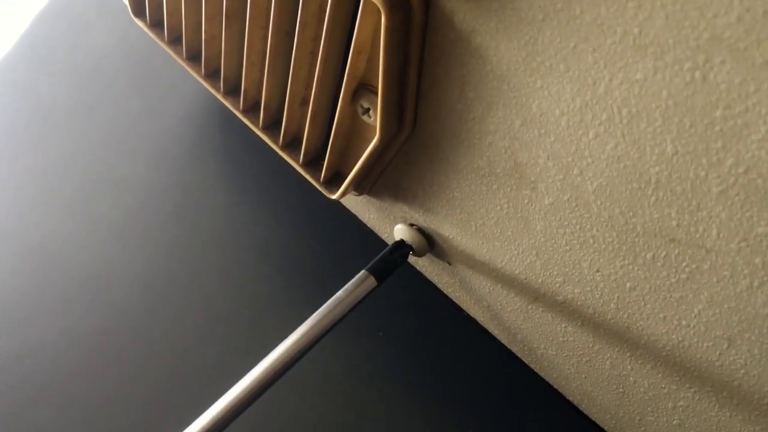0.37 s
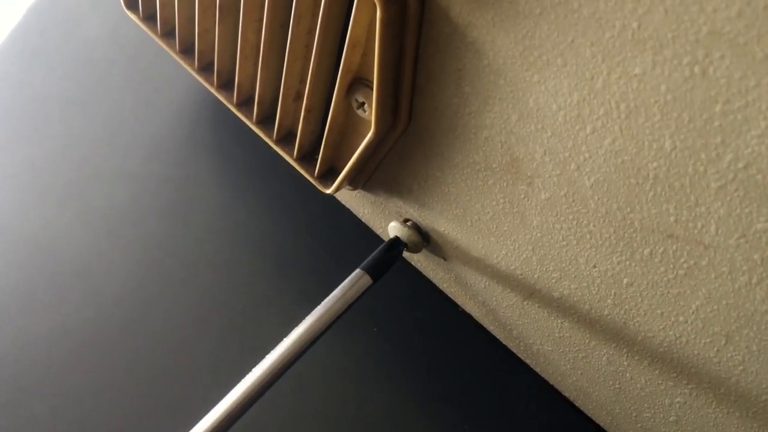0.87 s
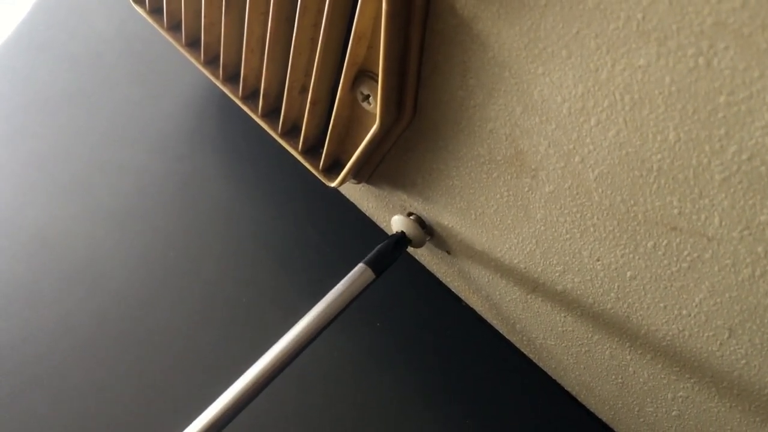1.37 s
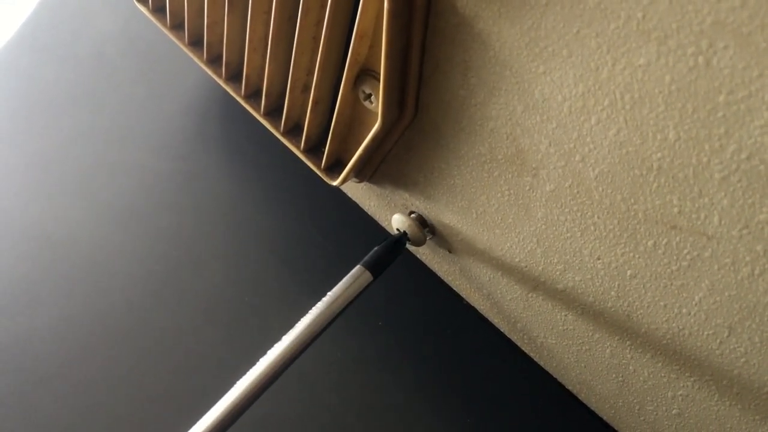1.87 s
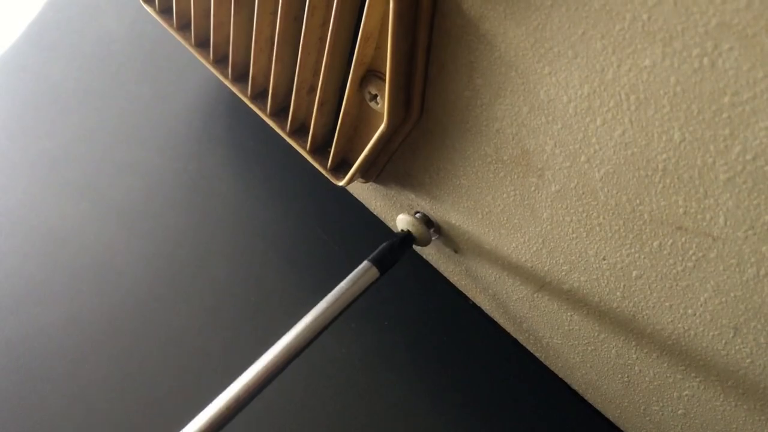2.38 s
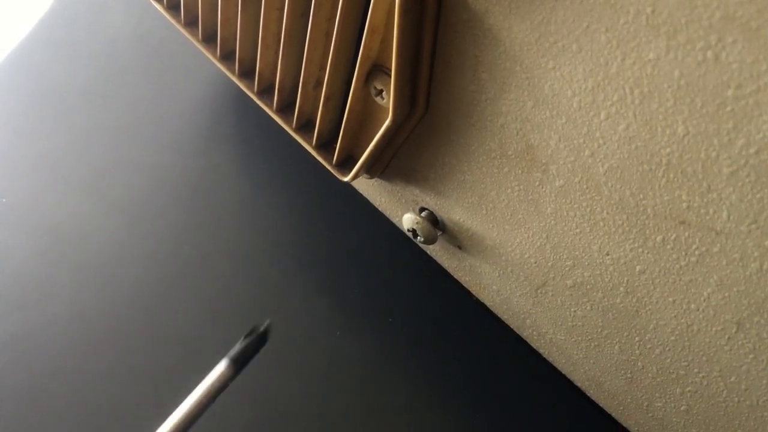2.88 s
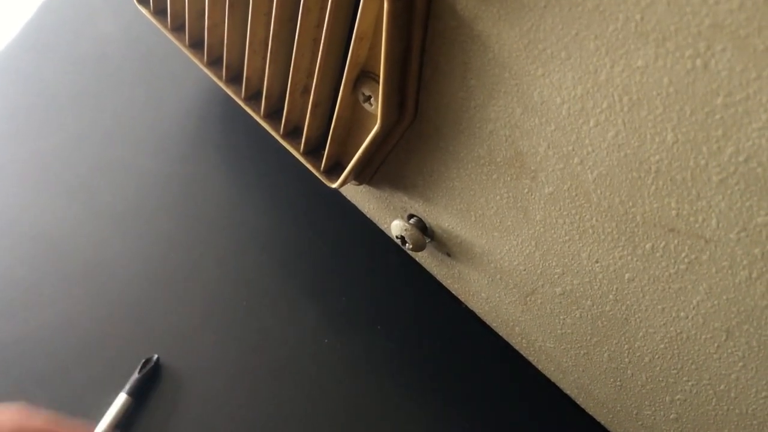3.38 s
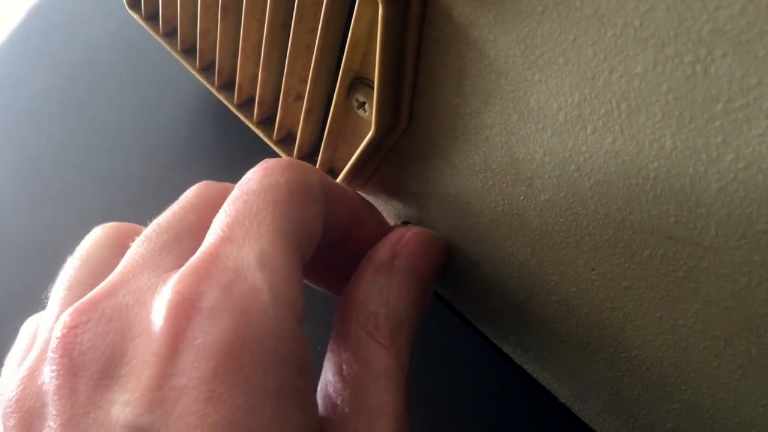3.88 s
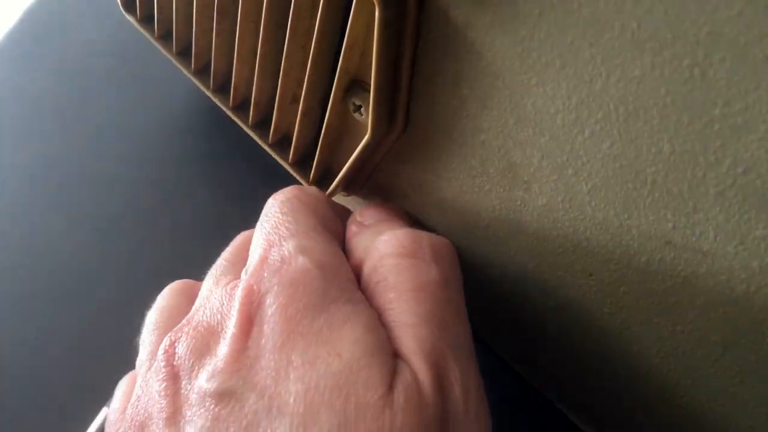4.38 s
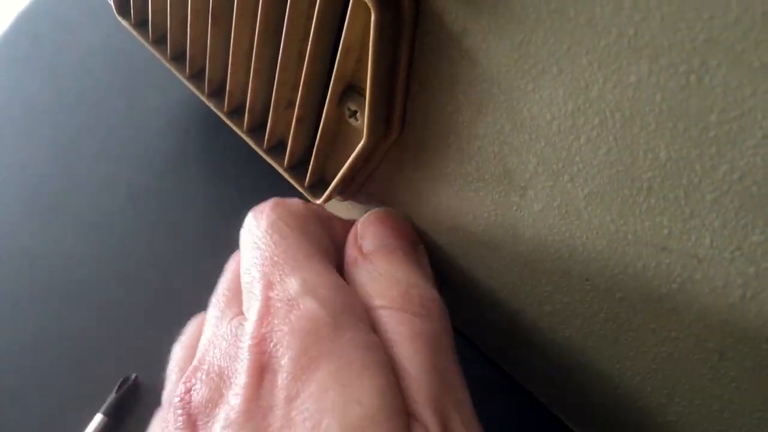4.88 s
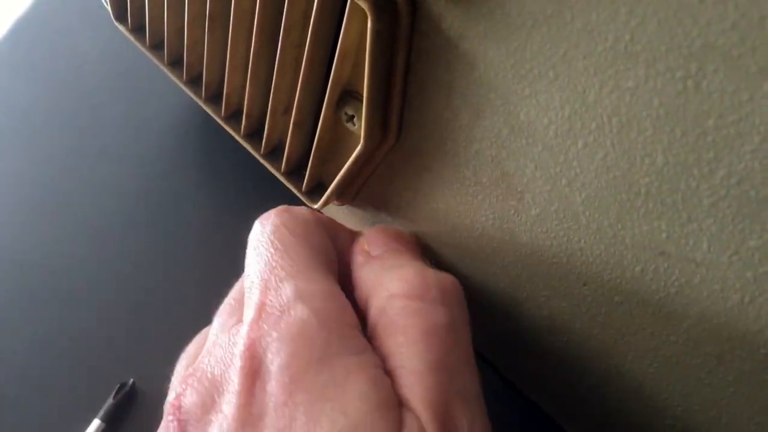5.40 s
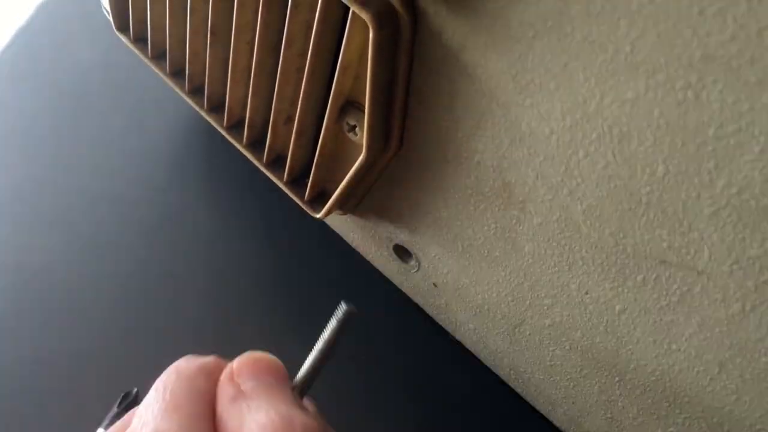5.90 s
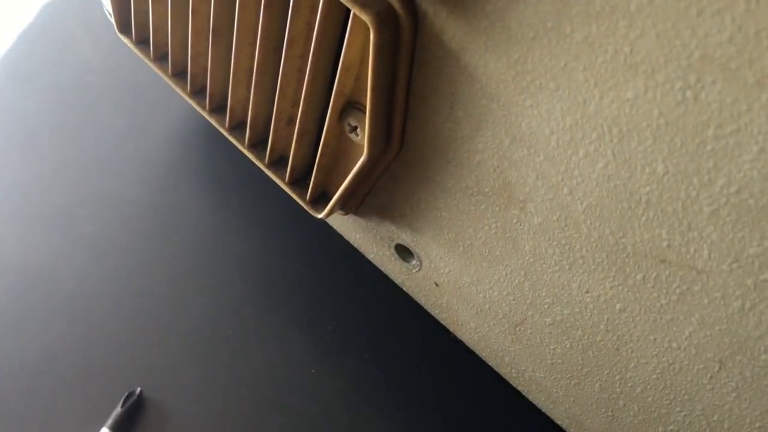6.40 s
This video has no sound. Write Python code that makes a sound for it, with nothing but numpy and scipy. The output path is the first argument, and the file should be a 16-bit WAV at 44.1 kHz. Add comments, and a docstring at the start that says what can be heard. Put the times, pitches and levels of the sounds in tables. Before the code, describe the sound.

Very close microphone, dry small room. Isolated creaky strokes of a screw in its thread make a thin metal panel ring and boom, growing denser before the screwdriver drops onto the bench, thudding and rattling briefly. A short lull follows, then fingers work the screw with light rubs, gritty scrapes and tinny knocks, loudest just before it comes out. A faint thin tone fades, and a tiny skid ends it.

```python
"""Small quiet room, one microphone close to a thin sheet-metal case: a hand screwdriver turns a screw.
The thread scrapes in grainy strokes, knocks ring and boom the case as modes, skin rubs as streaky noise.
At about 3.1 s the tool lands on the bench: a thud, ticking bounces and short skids.
From about 4 s bare fingers turn the screw on; at 5.84 s it is out and a thin sine tone lingers.
Near the end the screw skids on the bench; shaped room noise and a faint narrow hum lie behind it all."""
import sys
import numpy as np
from scipy import signal
from scipy.fft import rfft, irfft, next_fast_len
from scipy.io import wavfile
from scipy.ndimage import uniform_filter1d, map_coordinates

SR = 44100
rng = np.random.default_rng(int(sys.argv[2]) if len(sys.argv) > 2 else 0)


def field_ratio(decibels):
    """Amplitude ratio for a level in dB (20 dB per decade); scalars and array-likes work."""
    return 10 ** (np.asarray(decibels, dtype=float) / 20)


def waveform_to_disk(signal):
    """Save audio, clipped to [-1, 1], as 16-bit WAV at the path in sys.argv[1]."""
    frames = np.transpose(np.atleast_2d(signal))
    scaled = np.clip(frames, -1, 1) * 32767
    samples = np.round(scaled).astype(np.int16)
    wavfile.write(sys.argv[1], SR, samples)


N = 287311  # samples, about 6.5 s


def unit(x):
    """Scaled to rms 1."""
    return x / np.sqrt(np.mean(x ** 2) + 1e-20)


def along(points, hz):
    """Values read between (Hz, value) points on a log frequency axis."""
    f, v = np.transpose(points)
    return np.interp(np.log(hz + 1), np.log(f + 1), v)


def filtered(x, response):
    """x times a complex response of frequency."""
    m = next_fast_len(len(x) + SR // 2)
    return irfft(rfft(x, m) * response(np.fft.rfftfreq(m, 1 / SR)), m)[:len(x)]


def ringing(x, modes):
    """x driving damped resonances (Hz, width Hz, dB), summed with alternating sign."""
    def response(f):
        total = 0
        for k, (hz, width, db) in enumerate(modes):
            damping = 1j * f * width
            total = total + (-1) ** k * field_ratio(db) * damping / (hz * hz - f * f + damping)
        return total
    return filtered(x, response)


def driven(gain, force, modes):
    """Modes pushed by a force that follows a gain curve; they ring on after it stops."""
    return ringing(gain * force, modes) / np.std(ringing(force, modes))


def soft(force, contact_s):
    """A yielding contact spreads each push over its duration and loses the treble."""
    pad = np.hanning(round(contact_s * SR) + 3)
    return signal.fftconvolve(force, pad / pad.sum())[:len(force)]


def wobble(rate):
    """A smooth random curve, rate knots a second."""
    knots = rng.standard_normal(int(N * rate / SR) + 4)
    return map_coordinates(knots, [np.arange(N) * rate / SR])


def grit(rate, spread_db):
    """Tiny slips at random moments, rate a second, a few much larger than the rest; rms 1."""
    chance, size, sign = rng.random((3, N))
    strength = field_ratio(-spread_db * np.log(size + 1e-4))
    return unit((chance < rate / SR) * strength * np.sign(sign - 0.5))


def streaky(spectrum, depth_db, wide_hz, long_s, glide_hz=0, grains=0):
    """Noise of rms 1 in which narrow bands swell, fade and slide in pitch at random."""
    source = np.pad(rng.standard_normal(N) + grains, (0, 512))
    z = signal.stft(source, nperseg=512, noverlap=384)[2]
    field = uniform_filter1d(rng.standard_normal(z.shape), max(1, round(wide_hz * 512 / SR)), 0)
    field = uniform_filter1d(field, max(1, round(long_s * SR / 128)), 1)
    row, frame = np.indices(z.shape)
    slide = np.interp(frame[0] * 128, np.arange(N), wobble(11)) * glide_hz * 512 / SR
    field = map_coordinates(field, [row + slide * row / len(z), frame], order=1, mode="reflect")
    # whole regions of the band come and go too
    broad = uniform_filter1d(rng.standard_normal(z.shape), 25)
    broad = uniform_filter1d(broad, 30, 0)
    field = unit(field) + 0.8 * unit(broad)
    x = signal.istft(z * field_ratio(depth_db * unit(field)), nperseg=512, noverlap=384)[1][:N]
    return unit(filtered(x, lambda hz: field_ratio(along(spectrum, hz))))


def blow(db, modes, chatter_s, contact_s=0):
    """One contact: a chatter of force, 60 dB down in chatter_s, through uneven modes, scaled to its peak."""
    t = np.arange(SR // 4) / SR
    chatter = rng.standard_normal(len(t)) * field_ratio(-60 * t / chatter_s)
    force = soft(chatter * (1 - np.exp(-t / 0.0027)), contact_s)
    uneven = [(hz, width, level + rng.normal(0, 1.0)) for hz, width, level in modes]
    y = ringing(force, uneven)
    return field_ratio(db) * y / np.abs(y).max()


def add(track, s, sound):
    """Mix a sound in at time s."""
    at = round(s * SR)
    track[at:at + len(sound)] += sound[:N - at]


def swell(rows, column, rise):
    """Gain curve of short strokes: each rises over a share of its length, then falls."""
    out = np.zeros(N)
    for row in rows:
        u = np.linspace(0, 1, round(row[1] * SR) + 2)
        shape = np.sin(np.pi / 2 * np.minimum(u / rise, (1 - u) / (1 - rise))) ** 0.88
        add(out, row[0], field_ratio(row[column]) * shape)
    return out


def turning():
    """The screw scrapes round in strokes; skin slides and the case booms low, during and between them."""
    return thread_strokes() + low_booms() + skin()


# The screw slipping round in its thread, close to the microphone.
# Each row: start in seconds, length in seconds, level of the panels in dB, level of the scrape in dB.
STROKES = [(0.224, 0.052, -46, -50.5), (0.742, 0.051, -37.5, -46), (1.259, 0.13, -42.5, -61.5),
           (1.645, 0.05, -50, -57), (1.771, 0.14, -47, -56.5), (2.227, 0.061, -32, -50.5),
           (2.396, 0.12, -39, -46), (2.639, 0.038, -39, -45.5), (2.681, 0.069, -40.5, -46.5),
           (4.025, 0.0474, -36.5, -50.5), (4.433, 0.067, -53.5, -53), (4.728, 0.13, -33, -43.5),
           (4.953, 0.12, -43, -47), (5.276, 0.062, -41, -42.5), (5.428, 0.094, -35.5, -37),
           (5.521, 0.18, -43.5, -52.5), (5.713, 0.03, -51.5, -41.5), (5.739, 0.1, -40.5, -34)]
# Upper modes of the sheet-metal case, which the knocks ring too.
# Each row: centre in Hz, width in Hz, relative level in dB.
SHEET = [(608.6, 86, 5), (962, 91, -2.5), (1093, 130, -8), (1500, 300, -6), (1950, 93, -7.5),
         (2130, 81, -9), (2790, 120, -7), (3083, 130, -3.5), (3314, 440, -7), (4350, 700, -12.5)]


def thread_strokes():
    """Friction in the thread rings the sheet; the hiss grows more slowly than the scrape."""
    hiss_db, hiss_share = -29.5, 0.43  # hiss level = hiss_db + share of the scrape's dB
    strokes = [(*row, hiss_db + hiss_share * row[-1]) for row in STROKES]
    return friction(strokes, SHEET, rough_db=3.5)


# Colour of rubbing, for sliding skin and for the hiss at a scraping contact.
# Each row: frequency in Hz, relative density in dB per Hz.
RUB = [(2500, -21), (4200, -16), (5300, -2), (7000, -4.5), (9500, -6), (11500, -7.5), (14000, 1.5),
       (16000, -9)]


def friction(strokes, body, rough_db):
    """Slips in grains: they ring the body and hiss at the contact, while pushes shake the low panels."""
    slips = field_ratio(rough_db * wobble(90)) * grit(rate=3200, spread_db=0.5)  # the grip is never even
    drag = streaky([(1000, 0)], depth_db=1.3, wide_hz=600, long_s=0.04, grains=2 * slips)
    scrape = driven(swell(strokes, column=3, rise=0.36), drag, body)
    patchy = streaky(RUB, depth_db=4.5, wide_hz=910.5, long_s=0.04, grains=1.9 * slips)
    # falls 6 dB an octave either side of 7 kHz
    hiss = unit(filtered(patchy, lambda hz: field_ratio(-6 * np.abs(np.log2((hz + 1) / 7000)))))
    return shaking(strokes) + scrape + swell(strokes, column=4, rise=0.4) * hiss


# Broad low panels of the case, sounded by friction, by the low booms and by knocks.
# Each row: centre in Hz, width in Hz, relative level in dB.
BOOM = [(125.4, 46, -16.5), (150.6, 9.2, -0.5), (236.3, 16.5, 1.5), (376.2, 16, -13), (411.2, 53, -9.5),
        (542, 78, -3.5)]


def shaking(strokes):
    """Soft uneven pushes keep the low panels booming."""
    pushes = soft(grit(rate=600, spread_db=1.42), contact_s=0.0027)
    return driven(swell(strokes, column=2, rise=0.21), pushes, BOOM)


# Low booms of the case, alone or under knocks and scrapes.
# Each row: start in seconds, relative strength of the force in dB.
LOW_BOOMS = [(0.242, -31.5), (0.831, -31), (1.068, -58), (1.204, -44), (1.342, -38.5), (1.658, -39),
             (1.697, -54.5), (1.907, -38.5), (2.3, -38), (2.496, -37.5), (3.935, -35.5), (4.045, -34.5),
             (4.157, -44.5), (4.217, -43), (4.263, -52), (4.806, -33.5), (4.94, -39), (5.304, -31.5)]


def low_booms():
    """Each boom starts with one soft shove of force, then trembles; only the low panels answer."""
    tremble_s = 0.039
    shove_db, tremble_db = 56, 30  # force added to each boom's relative strength
    trembles = [(s, tremble_s, db) for s, db in LOW_BOOMS]
    trembling = swell(trembles, column=2, rise=0.29) * grit(rate=600, spread_db=2.6)
    force = field_ratio(tremble_db) * trembling
    for s, db in LOW_BOOMS:
        force[round(s * SR)] += field_ratio(db + shove_db)
    return ringing(soft(force, contact_s=0.0032), BOOM)


# Skin sliding on the handle or the screw head, close to the microphone.
# Each row: start in seconds, level in dB.
RUBS = [(0.027, -65), (0.089, -58), (0.129, -54.5), (0.359, -57.5), (0.552, -60.5), (0.63, -59.5),
        (0.7, -63.5), (0.881, -65.5), (1.072, -63.5), (1.159, -56), (1.461, -62), (1.602, -56.5),
        (1.724, -61), (1.796, -56), (1.928, -58), (2.174, -57), (2.368, -56.5), (2.51, -59.5),
        (2.731, -51.5), (2.81, -62.5), (3.059, -59.5), (4.207, -60), (4.303, -55), (4.898, -57),
        (5.067, -60.5), (5.243, -65), (5.366, -50)]


def skin():
    """Sliding skin is a grainy, streaky hiss; a thin decaying tone lingers once the screw is out."""
    slide_s = 0.083
    palm = (0.0, 3.05, -73)  # on the handle all the while: start s, length s, dB
    slides = [palm] + [(s, slide_s, db) for s, db in RUBS]
    grains = 0.69 * grit(rate=930, spread_db=2.5)
    hiss = streaky(RUB, depth_db=7.5, wide_hz=330, long_s=0.072, glide_hz=350, grains=grains)
    out = swell(slides, column=2, rise=0.25) * hiss
    freed_s, tone_hz, tone_db, t60_s = 5.84, 3549, -78.5, 1
    t = np.arange(SR) / SR
    add(out, freed_s, field_ratio(tone_db - 60 * t / t60_s) * np.sin(2 * np.pi * tone_hz * t))
    return out


# The tip or the screw knocking the case, close to the microphone.
# Each row: start in seconds, peak of the sheet in dB, hardness as tick over that peak in dB,
# pitch in Hz that the struck spot rings best.
KNOCKS = [(0.241, -30.5, -12, 900), (0.83, -22, -24, 940), (1.284, -34, -9, 920), (1.596, -44.5, -21, 520),
          (1.65, -36.5, 6.5, 760), (1.826, -39, 3, 3280), (2.231, -24, -8, 970), (2.249, -29.5, 6, 3050),
          (2.267, -22.5, -4.5, 1470), (2.401, -27.5, -10.5, 1570), (2.422, -27, 3, 3530),
          (2.492, -23, 1.5, 1350), (2.654, -27.5, -41, 720), (2.685, -30.5, -2.5, 4380),
          (2.72, -31.5, 0, 3460), (3.831, -40.5, 1, 506), (3.936, -48.5, 6, 2650), (4.449, -35, 3, 1500),
          (4.546, -58.5, 13.5, 3000), (4.587, -27, -15.5, 1420), (4.811, -36, 4.5, 2830),
          (5.02, -26.5, -29, 1120), (5.079, -37, -3.5, 3370), (5.308, -24, -25, 930),
          (5.521, -21.5, -5.5, 1080), (5.571, -28.5, 9, 2210), (5.691, -24, -29, 2620),
          (5.7009, -16.5, -16.5, 1930), (5.81, -47.5, 14, 4100), (5.825, -44, 15, 4100)]


def knocks():
    """Each knock rings the sheet in the colour of its spot, booms the panels and ticks at the contact."""
    spot_db_per_octave = 9  # modes fade away from the spot's best pitch
    boom_db = -22  # panels over the knock's peak
    out = np.zeros(N)
    for s, db, tick_db, spot_hz in KNOCKS:
        spot = [(hz, width, level - spot_db_per_octave * abs(np.log2(hz / spot_hz)))
                for hz, width, level in SHEET]
        add(out, s, blow(db, spot, chatter_s=0.016, contact_s=0.073 / spot_hz))
        add(out, s, blow(db + boom_db, BOOM, chatter_s=0.0068, contact_s=0.0024))
        tick = [(6600 * field_ratio(rng.normal(0, 1.0)), 1800, 0), (11500, 5000, -10)]
        add(out, s, blow(db + tick_db, tick, chatter_s=0.0097))
    return out


# The tool landing and bouncing on the bench. Each row: start in seconds, peak in dB.
DROP = [(3.1612, -21), (3.2062, -23), (3.228, -16), (3.2397, -23), (3.256, -35.5)]
# The tool, and last the screw, skidding on the bench.
# Each row: start in seconds, length in seconds, rumble in dB, clatter in dB, hiss in dB.
SKIDS = [(3.105, 0.074, -44.5, -40, -48), (3.162, 0.076, -37, -39, -47), (3.205, 0.074, -44, -33.5, -61.5),
         (6.478, 0.056, -74.5, -41.5, -79.5)]
# Modes of bench and tool. Each row: centre in Hz, width in Hz, relative level in dB.
BENCH = [(530, 130, -9.5), (900, 120, 1.5), (1300, 120, 0), (1587, 130, -2.5), (2066, 120, -3),
         (2260, 220, -4.5), (2590, 170, -2), (3540, 320, -9.5)]
# Modes of the steel shaft. Each row: centre in Hz, width in Hz, relative level in dB.
SHAFT = [(6150, 500, 1.5), (7540, 8400, -10), (8700, 830, -7.5)]


def dropped_tool():
    """The handle thuds on the bench, the shaft ticks at each bounce, and friction makes the skids."""
    thud_s, thud_db = 3.1572, -10
    shaft_db = 3.5  # shaft tick over each bounce
    out = friction(SKIDS, BENCH, rough_db=0.5)
    handle = [(520, 420, 0), (90, 120, -17)]
    add(out, thud_s, blow(thud_db, handle, chatter_s=0.0015, contact_s=0.0022))
    for s, db in DROP:
        add(out, s, blow(db, BENCH, chatter_s=0.027))
        add(out, s, blow(db + shaft_db, SHAFT, chatter_s=0.004))
    return out


# How long the small room answers. Each row: frequency in Hz, time to fall 60 dB in seconds.
ROOM = [(150, 0.37), (600, 0.18), (2500, 0.16), (10000, 0.12)]


def room(x):
    """Each frequency of the room's answer dies at its own speed; every quarter second gets its own tail."""
    out, step = np.zeros(N), SR // 4
    for at in range(0, N, step):
        hz, t, z = signal.stft(rng.standard_normal(SR // 2), SR, nperseg=256)
        decay = field_ratio(-60 * t / along(ROOM, hz)[:, None])
        tail = signal.istft(z * decay, SR, nperseg=256)[1]
        late = np.pad(x[at:at + step], (130, 0))  # the answer starts 3 ms later
        add(out, at / SR, signal.fftconvolve(late, tail / np.linalg.norm(tail)))
    return filtered(out, lambda hz: 1 / (1 + 1j * hz / 5000))  # soft furnishings dull the answer


# Colour of the room air. Each row: frequency in Hz, relative density in dB per Hz.
AIR = [(25, -22.5), (62, -7.5), (105, -15), (150, -9), (400, -20.5), (1100, -29), (3600, -34),
       (4800, -38.5), (16000, -43.5)]
# The background sinks after loud moments and comes back. Each row: time in seconds, level of the background in
# dB.
AIR_DRIFT = [(0, -65.5), (2.899, -67.5), (3.399, -75.5), (3.9, -64.5), (5.901, -68), (6.25, -75)]
# A faint steady narrow hum. Its one row: centre in Hz, width in Hz, level in dB.
HUM = [(847, 25, -81)]


def air():
    """Quiet shaped noise whose level drifts, with a faint hum of narrow-band noise."""
    (hz, width, db), = HUM
    hum = field_ratio(db) * unit(ringing(rng.standard_normal(N), [(hz, width, 0)]))
    drift = field_ratio(np.interp(np.arange(N) / SR, *np.transpose(AIR_DRIFT)))
    return drift * streaky(AIR, depth_db=1, wide_hz=300, long_s=0.06) + hum


def scene():
    """All sources close to one microphone, with the room's answer and the air behind."""
    hits = knocks() + dropped_tool()
    work = turning()
    answer = room(field_ratio(-4.0) * hits + field_ratio(-7.0) * work)
    return (hits + work + answer + air())[None]


def band_limit(x):
    """A steep low-pass at the top of the band."""
    return signal.sosfilt(signal.butter(12, 16670, fs=SR, output="sos"), x)


def record(dry):
    """The microphone rolls off the deep bass below 62 Hz; nothing passes above 16.1 kHz."""
    def microphone(hz):
        return (1j * hz / (62 + 1j * hz)) ** 2 * (hz < 16100)
    mix = filtered(dry[0], microphone)[None]
    return band_limit(mix)


dry = scene()
out = record(dry)
waveform_to_disk(out)
```